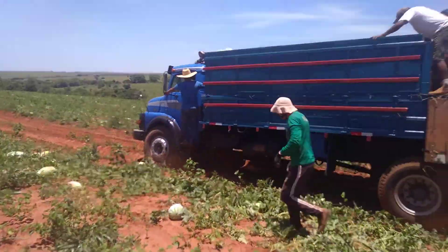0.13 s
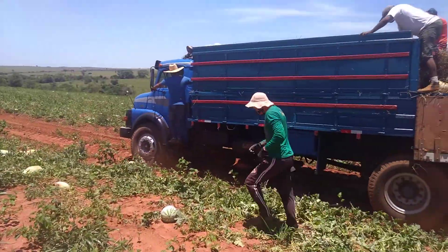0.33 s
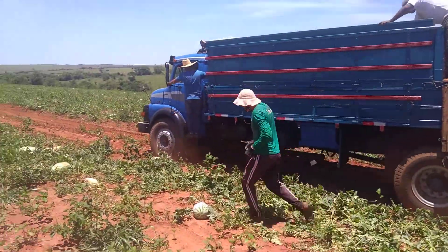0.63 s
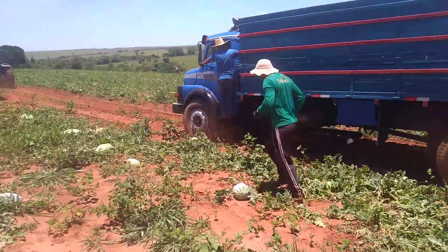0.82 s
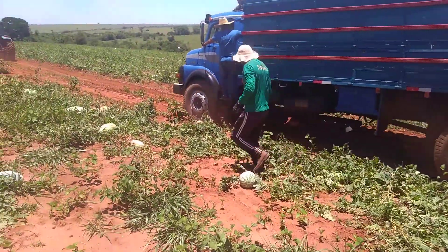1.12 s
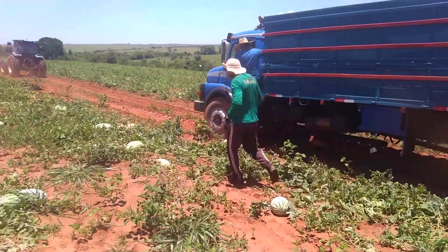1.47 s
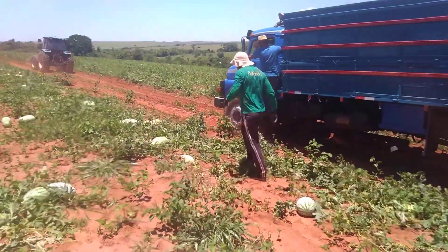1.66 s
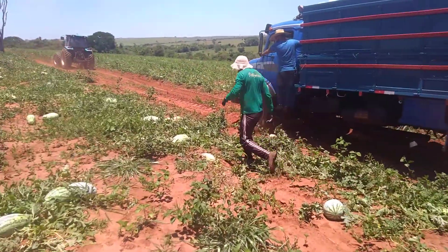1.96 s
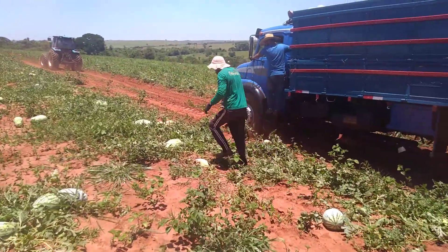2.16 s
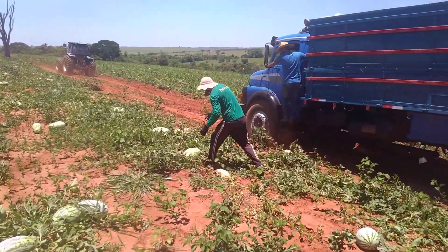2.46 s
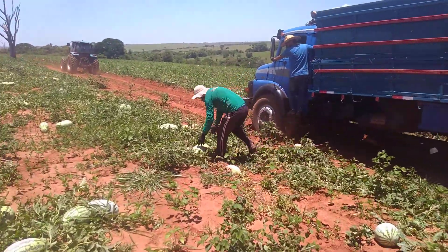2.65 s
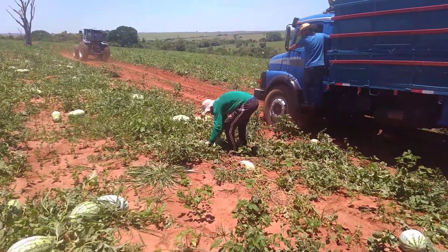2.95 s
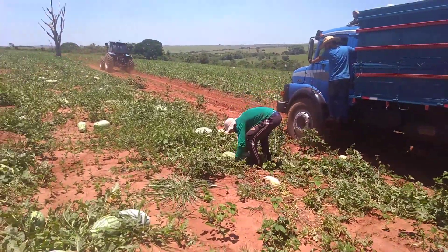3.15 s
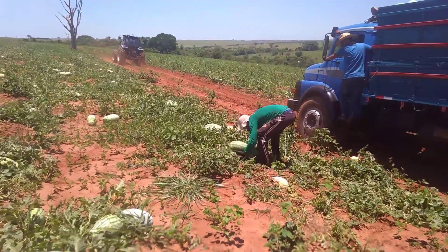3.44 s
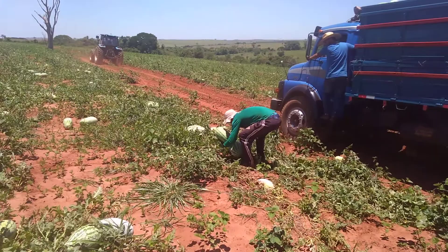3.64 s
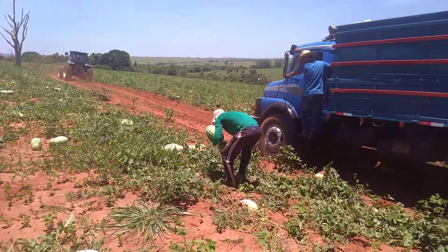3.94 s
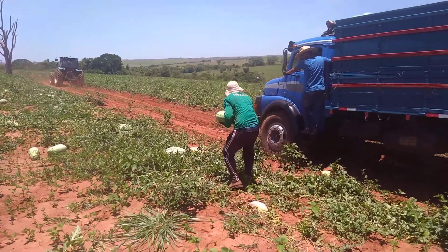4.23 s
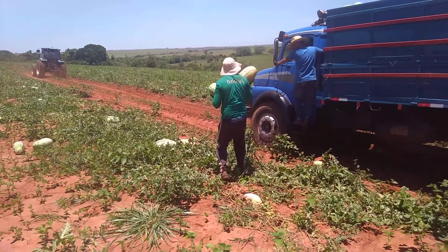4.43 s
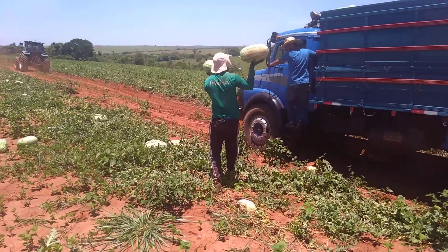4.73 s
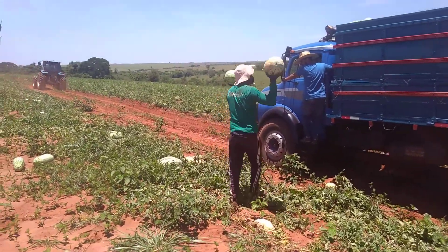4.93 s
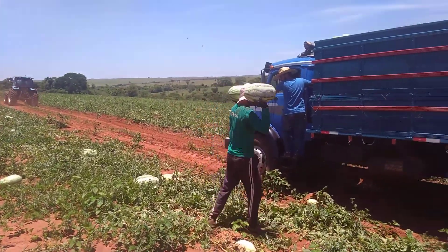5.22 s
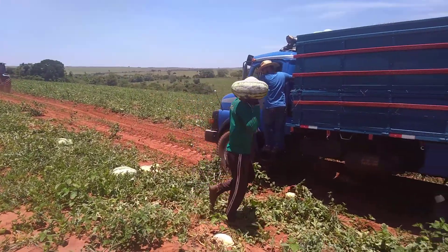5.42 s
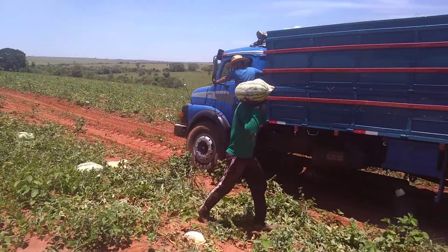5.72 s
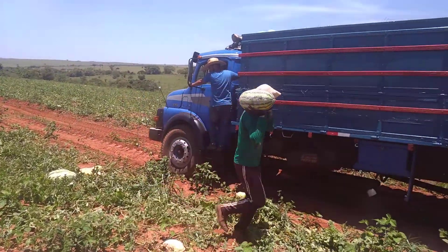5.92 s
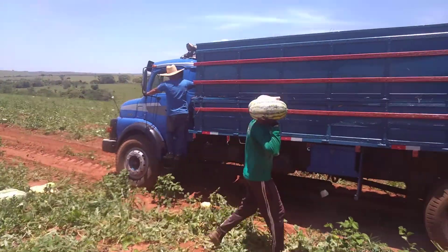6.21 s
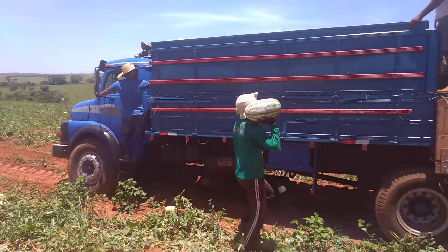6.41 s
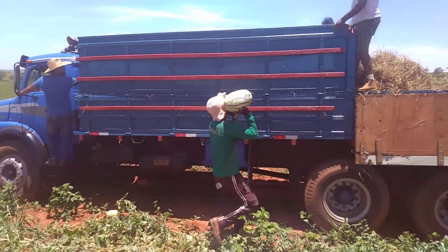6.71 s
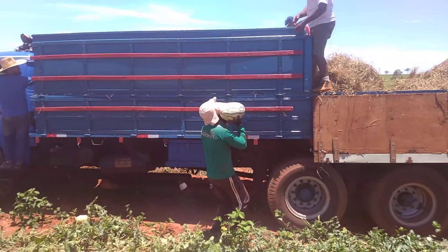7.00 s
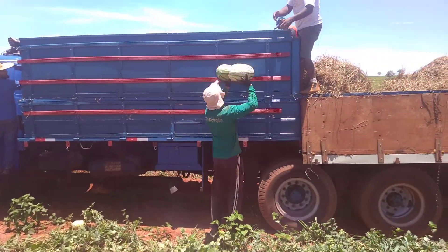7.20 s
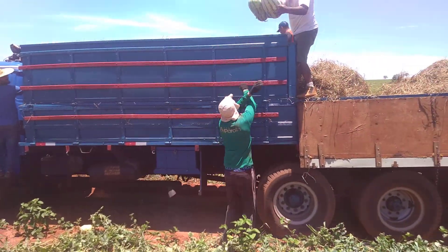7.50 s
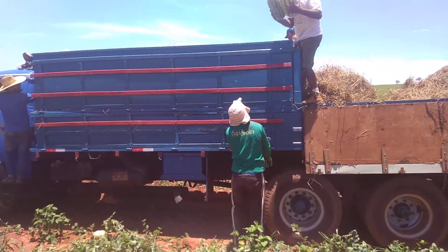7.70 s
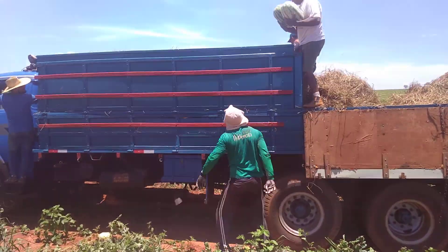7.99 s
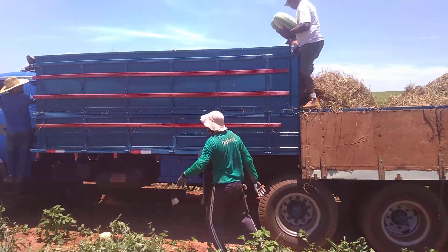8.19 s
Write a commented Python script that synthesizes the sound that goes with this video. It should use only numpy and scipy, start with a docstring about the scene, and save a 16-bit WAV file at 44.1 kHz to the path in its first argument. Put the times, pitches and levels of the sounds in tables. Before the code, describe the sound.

A big diesel truck idles unevenly in an open field, then bursts into loud booms, hard clattering and steel knocks before settling again.

```python
"""A diesel truck's exhaust booms and drones at a hunting idle while its block clatters and injections ping.
Sines and noise bursts locked to one six-cylinder crank make the engine; bursts of load harden its cracks.
Struck modes make steel knocks, clinks of a loose fitting and thumps of the cargo body.
Shaped noise makes the open-air hiss, the swish of dry leaves and the rumble as the exhaust swells."""
import sys
import numpy as np
from scipy import signal
from scipy.fft import rfft, irfft
from scipy.io import wavfile
from scipy.ndimage import uniform_filter1d, map_coordinates

SR = 44100
rng = np.random.default_rng(int(sys.argv[2]) if len(sys.argv) > 2 else 0)


def generate_wav(sig):
    """Save sig (samples, or channels by samples) to the path in sys.argv[1] as 16-bit PCM at SR."""
    pcm = np.round(np.clip(np.atleast_2d(sig).T, -1, 1) * 32767).astype(np.int16)
    wavfile.write(sys.argv[1], SR, pcm)


N = 368676
T = np.arange(N) / SR  # seconds

# The cylinders' relative strengths in firing order.
# Each row: exhaust in dB, knock in dB, tick in dB.
CYLINDERS = [(1, -1, -5), (-4, -3, -9), (-3, -3, -9), (0, -1, -6), (2, 3.5, 4), (2, 3, 2.5)]


def undb(db):
    """Decibels to gain."""
    return 10 ** (np.asarray(db) / 20)


def curves(table):
    """Each column of a table as a line through time."""
    s, *columns = np.transpose(table)
    return [np.interp(T, s, column) for column in columns]


def unit(x):
    """Scale to rms 1."""
    return x / np.sqrt(np.mean(x ** 2))


def pan(db):
    """Left and right gains, db apart, whose mean is 1."""
    gains = undb(np.array([db, -db]).reshape(2, -1) / 2)
    return gains / gains.mean(axis=0)


def colour(x, points):
    """Causal minimum-phase filter with the given (Hz, dB) outline; the result has rms 1."""
    hz, db = np.transpose(points)
    f = np.maximum(np.fft.rfftfreq(2 * N, 1 / SR), 1)
    skirts = np.minimum(f / hz[0], 1) ** 2 * np.minimum(hz[-1] / f, 1) ** 2
    outline = undb(np.interp(np.log(f), np.log(hz), db))
    # folding the cepstrum forward in time makes the filter causal
    cepstrum = irfft(np.log(skirts * outline))
    response = np.exp(rfft(2 * cepstrum[:N], 2 * N))
    return unit(irfft(rfft(x, 2 * N) * response)[..., :N])


def walk(rate):
    """Smooth random drift of rms 1, with rate new values a second."""
    k = int(SR / rate)
    steps = np.repeat(rng.standard_normal(N // k + 1), k)
    return unit(uniform_filter1d(uniform_filter1d(steps, k), k)[:N])


def air(side):
    """Stereo noise; side is the weight of the part opposite in the two ears."""
    mid, other = rng.standard_normal((2, N))
    return mid + side * other * np.array([[1], [-1]])


def firings(crank, pattern_db, scatter_db, decay, rise=0.006):
    """Each firing swells and dies within shares of its period; every cylinder has its own strength."""
    index, phase = np.floor(crank).astype(int), crank % 1
    scatter = scatter_db * rng.standard_normal(index.max() + 1)[index]
    size = undb(pattern_db[index % len(pattern_db)] + scatter)
    return unit(size * (1 - np.exp(-phase / rise)) * np.exp(-phase / decay))


def swells(column):
    """Left and right gain of one part of the exhaust's bell-shaped swells, summed as power."""
    # Surges of the exhaust and the air around it.
    # Each row: peak in seconds, time from the peak to 1/e in seconds, boom level in dB, drone level in dB,
    # pulse gain in dB, rumble level in dB, left minus right in dB.
    surges = [(0.937, 0.18, -28, -33, -53, -41, 5), (4.559, 0.056, -46, -32.5, -41, -31.5, 3),
              (4.667, 0.071, -22, -24.5, -38, -28, -4), (4.77, 0.041, -26.5, -45, -77, -51, -1),
              (5.134, 0.097, -20.5, -21, -26, -26, -14), (5.249, 0.077, -37, -15, -50, -60, 10.5),
              (5.39, 0.15, -37, -26.5, -31.5, -30.5, 6.5), (5.556, 0.16, -38.5, -15, -35, -48, 9.5),
              (5.572, 0.059, -40.5, -32, -22, -43, 2), (5.791, 0.16, -38, -31.5, -36.5, -47.5, 6),
              (6.08, 0.14, -24, -33, -38.5, -39, -18), (6.304, 0.16, -31, -37.5, -54, -37.5, -11),
              (6.617, 0.16, -28.5, -34, -45.5, -40, -8), (7.78, 0.81, -43, -49, -75, -49, 1)]
    power = 0
    for row in surges:
        bell = np.exp(-((T - row[0]) / row[1]) ** 2)
        power = power + (undb(row[column]) * bell * pan(row[-1])) ** 2
    return np.sqrt(power)


def engine_cycle(crank):
    """Position in engine cycles: one cycle takes a firing of every cylinder."""
    return (crank - 5.1) / len(CYLINDERS)


def boom(crank, hz, lope=0.13, idle_lope=0.23, flutter_db=1.83):
    """A deep tone at the firing rate, picked out at idle by the pipe's resonance."""
    # the idle tone is 1 dB down one width away from the resonance
    level_db, resonance_hz, width_hz = -37, 45.6, 1.73
    cycle = engine_cycle(crank)
    idle = 0
    # neighbours one cycle rate away make the boom throb off resonance
    for k in (-1, 0, 1):
        off_hz = hz * (1 + k / len(CYLINDERS)) - resonance_hz
        gain = idle_lope ** abs(k) * undb(level_db - (off_hz / width_hz) ** 2)
        idle = idle + gain * unit(np.sin(2 * np.pi * (crank + k * cycle)))
    loping = (1 + lope * np.cos(2 * np.pi * cycle)) * np.sin(2 * np.pi * crank)
    swelling = unit(loping) * swells(2)
    return (idle * pan(4.5) + swelling) * undb(flutter_db * walk(17))


def drone(crank, hz, lope=0.25, flutter_db=1.83):
    """A tone at twice the firing rate that lopes in level and phase once an engine cycle."""
    level_db, db_per_hz, reference_hz = -38.5, 0.41, 45.6  # the idle part grows with engine speed
    turn = 2 * np.pi * engine_cycle(crank)
    tone = (1 + lope * np.cos(turn)) * np.sin(4 * np.pi * crank + lope * np.sin(turn))
    idle_gain = undb(level_db + db_per_hz * (hz - reference_hz)) * pan(4.5)
    return unit(tone) * undb(flutter_db * walk(16)) * np.hypot(idle_gain, swells(3))


def exhaust_pulses(crank, idle_gain_db=-48.5, gas=0.44):
    """Sharp pipe pulses at idle give way to growling overtones in the swells; each firing puffs noise."""
    # Outline of the pipe. Each row: frequency in Hz, level in dB.
    pipe_outline = [(60, -4), (112, -5), (135, -1.5), (157, 5), (182, -1), (208, 2), (232, -5.5),
                    (300, -4.5), (400, -15), (560, -22.5), (900, -51)]
    # Exhaust overtones under load. Each row: frequency in Hz, level in dB.
    growl_outline = [(100, -13), (155, 5), (260, -2.5), (420, -10.5), (600, -18), (1000, -31.5)]
    surge = swells(4).mean(axis=0)
    pulse_gain = np.hypot(undb(idle_gain_db), surge)
    pattern_db = np.transpose(CYLINDERS)[0]
    loaded = np.clip((surge / pulse_gain) ** 4, 0, 1)
    idle = colour(firings(crank, pattern_db, scatter_db=2.5, decay=0.014), pipe_outline)
    # under load the cylinders fire more evenly, so the overtones stand clear
    pulling = -colour(firings(crank + .24, pattern_db / 2, scatter_db=3, decay=.04), growl_outline)
    puff_noise = air(side=0.067) * firings(crank, pattern_db, scatter_db=1.0, decay=0.72)
    puffs = colour(puff_noise, pipe_outline) * (gas + 0.59 * (1 - loaded))
    pulses = np.sqrt(1 - loaded) * idle * 0.69 + np.sqrt(loaded) * pulling + puffs
    return pulses * pulse_gain * pan(4.3)


def exhaust(crank, hz):
    """The pipe sounds two loping deep tones together with the pressure pulse of each firing."""
    return boom(crank, hz) + drone(crank, hz) + exhaust_pulses(crank)


def load(column):
    """Left and right gain of one part of the bursts of load: attack, hold, release."""
    # The engine takes load in bursts.
    # Each row: start in seconds, length before release in seconds, relative clatter level in dB,
    # relative injection crack level in dB, left minus right in dB.
    efforts = [(4.453, 0.14, -1.5, -5.5, 0.5), (4.574, 0.084, -5.5, -8, -5), (4.877, 0.16, -1, -8, -1),
               (5, 0.18, 0.5, -5, -8.5), (5.294, 0.31, -2.5, -0.5, 6), (5.725, 0.33, -6, -9, -3),
               (6.178, 0.2, -8.5, -15.5, -11.5), (6.424, 0.17, -13.5, -18, -21)]
    attack_s, release_s = 0.041, 0.043
    power = 0
    for row in efforts:
        s, length = row[:2]
        attack = np.clip((T - s) / attack_s, 0, 1)
        release = np.exp(-np.maximum(T - s - length, 0) / release_s)
        power = power + (attack * release * undb(row[column]) * pan(row[-1])) ** 2
    return np.sqrt(power)


def covers(drive, grain_db=6.5, seating_db=6.5):
    """Thin covers resonate to uneven grains of the block noise; each comes and goes on its seat."""
    # Resonances of the engine's covers. Each entry: frequency in Hz.
    cover_modes = [759, 958, 1077, 1322, 1594, 2010, 2330]
    tilt_db_per_octave, width_hz = -2, 41
    out = 0
    for hz in cover_modes:
        grains = drive * undb(grain_db * walk(260))
        ring = signal.lfilter(*signal.iirpeak(hz, hz / width_hz, fs=SR), grains)
        tilt_db = tilt_db_per_octave * np.log2(hz / cover_modes[0])
        out = out + ring * undb(tilt_db + seating_db * walk(9))
    return unit(out)


def ping(crank, sustain=0.47, crack_hz=2780, crack_ring=0.73, upper_ring_hz=3350):
    """Every injection renews a thin, fluttering ring; load adds hard, ringing cracks."""
    # Injector ping at idle.
    # Each row: time in seconds, pitch in Hz, ring level in dB, upper ring level in dB.
    ping_course = [(.45, 3200, -77, -79), (.85, 3154, -61.5, -70), (1.95, 3107, -62.5, -60.5),
                   (2.35, 3180, -79, -93), (3.05, 3050, -64, -76), (3.65, 3107, -59.5, -77),
                   (3.92, 3026, -56.5, -60), (4.05, 3060, -63, -68), (4.22, 3066, -51.5, -60),
                   (4.47, 3080, -55, -87), (4.6, 3100, -73.5, -79)]
    # Ring of the hard injections under load. Each row: frequency in Hz, level in dB.
    rasp_outline = [(1100, -19.5), (1300, -7.5), (1700, -8.5), (2100, -33), (2450, -17), (2700, 7),
                    (2950, -0.5), (3200, -13), (3700, -24), (4500, -6.5), (4850, -9), (5300, -10.5),
                    (6200, -18.5), (9000, -20), (11000, -53)]
    hz, db, upper_db = curves(ping_course)
    stroke = crank + .1
    pattern_db = np.transpose(CYLINDERS)[1]

    def ring(hz, breadth):
        """A tone roughened by phase wander (radians) and level flutter."""
        wander = breadth * walk(480) + 1.5 * walk(60)
        return unit(np.sin(2 * np.pi * np.cumsum(hz) / SR + wander) * undb(2 * walk(160)))

    strokes = unit(sustain + firings(stroke, pattern_db / 2, scatter_db=2.2, decay=.17, rise=.2))
    lower_ring = ring(hz, 0.8) * undb(db)
    upper_ring = ring(np.full(N, upper_ring_hz), 2.1) * undb(upper_db)
    idle = strokes * (lower_ring + upper_ring)
    injections = unit(.3 + firings(stroke, pattern_db / 3, scatter_db=2, decay=.11, rise=.3))
    rasp = colour(air(side=.6) * injections, rasp_outline)
    cracks = rasp + crack_ring * injections * ring(np.full(N, crack_hz), 1.6)
    return idle + cracks * undb(-40) * load(3) * pan(-1.0)


def clatter(crank, knock_flutter_db=1.0, knock_wash=1.0, even_load=0.23):
    """Combustion rattles the block and knocks in the cylinders; pump and valves tick in a cyclic pattern."""
    # Outlines of the block, the knock and the ticks. Each row: frequency in Hz, level in dB.
    block_outline = [(300, -19), (560, -14.5), (760, 6), (1050, 3), (1300, 6.5), (1600, -3), (2100, -2.5),
                     (2700, -19), (4000, -24), (9000, -46)]
    knock_outline = [(700, -29), (1300, 17.5), (1750, 8), (2020, -3), (2450, 5), (2900, 0.5), (3700, -7),
                     (4400, -3), (4850, -19.5), (5200, -2.5), (7000, -19), (9200, -29), (10200, -36),
                     (15000, -87)]
    tick_outline = [(1300, 1), (2350, 8), (2900, 5), (3500, 3.5), (4200, 1.5), (4900, -4.5), (5120, 0),
                    (5600, 0), (6300, -7), (7400, -7), (10000, -19), (15500, -43)]
    # Clatter between the bursts.
    # Each row: time in seconds, block gain in dB, tick gain in dB.
    idle_course = [(0, -49.5, -69.5), (.55, -49.5, -57.5), (1.1, -53.5, -63), (2.5, -52, -63.5),
                   (3.3, -55.5, -62.5), (4.45, -52, -62.5), (4.78, -57.5, -83), (5.2, -42, -48.5),
                   (6.5, -49, -60), (6.93, -43, -54.5), (7.5, -49.5, -61.5), (8.36, -51, -60)]
    # Bearing of the engine. Each row: time in seconds, lead of the left ear in ms.
    bearing = [(0, 0.11), (1.2, 0.23), (3.7, 0.25), (5.7, 0.353), (6.7, 0.02)]
    knock_over_tick_db, load_db, cover_db = -9.5, -42, -7
    _, knock_pattern, tick_pattern = np.transpose(CYLINDERS)
    block_db, tick_db = curves(idle_course)
    effort = load(2)

    def gain(idle_db):
        """Idle and load add as power."""
        return np.hypot(undb(idle_db) * pan(3), undb(load_db) * effort)

    stroke = crank + .08
    # the harder the engine works, the more alike its cylinders tick
    contrast = np.interp(effort.mean(axis=0), [0, even_load], [1, .45])
    block_beat = firings(stroke, knock_pattern, scatter_db=2.6, decay=.6, rise=.1)
    knock_beat = firings(stroke, knock_pattern * .6, scatter_db=2.6, decay=.2, rise=.1)
    tick_beat = firings(stroke, tick_pattern, scatter_db=1.6, decay=.8, rise=.1)
    block_noise = air(side=.4) * (1 + block_beat)
    knock_noise = air(side=.6) * (knock_wash + knock_beat) * undb(knock_flutter_db * walk(170))
    tick_noise = air(side=.9) * (.17 + tick_beat) ** contrast
    block = 0.68 * colour(block_noise, block_outline) + undb(cover_db) * covers(block_noise)
    block = block * gain(block_db)
    knock = colour(knock_noise, knock_outline) * gain(tick_db + knock_over_tick_db)
    ticks = colour(tick_noise, tick_outline) * gain(tick_db) * pan(4)
    left, right = block + knock + ticks + ping(crank)
    # delay the right ear
    lead_ms, = curves(bearing)
    return np.array([left, map_coordinates(right, [np.arange(N) - lead_ms * SR / 1000], order=3)])


def open_air():
    """Soft, slowly drifting hiss of the open field, as shaped noise."""
    # Outline of the hiss. Each row: frequency in Hz, level in dB.
    hiss_outline = [(200, -3.5), (600, -19.5), (800, -10), (1300, -16.5), (2500, -25), (4000, -31.5),
                    (7000, -38.5), (11000, -41), (15500, -43)]
    return colour(air(side=0.42), hiss_outline) * undb(-55.5 + 0.35 * walk(0.9)) * pan(5.9)


def rumble():
    """The air rumbles with each exhaust swell, as low noise."""
    outline = [(10, -35), (28, -25.0), (50, 3), (100, -2.0), (250, -18), (600, -27.0)]
    return colour(air(side=0.75), outline) * swells(5)


def dry_leaves():
    """Leaves brush in short bell-shaped swishes of crisp, grainy noise."""
    # Swishes of leaves.
    # Each row: peak in seconds, level in dB, bell's standard deviation in seconds, left minus right in dB.
    swish_list = [(0.61, -58.5, 0.034, 8), (0.912, -60, 0.032, 22), (0.99, -61, 0.04, 24),
                  (1.508, -49, 0.015, 8), (2.07, -56, 0.03, 22), (2.443, -55.5, 0.036, 24),
                  (4.531, -49, 0.028, 14), (4.928, -49, 0.026, 17), (6.136, -47.5, 0.012, 4.5),
                  (6.19, -50.5, 0.038, -1), (6.925, -53, 0.032, 26)]
    # Outline of the leaves. Each row: frequency in Hz, level in dB.
    leaf_outline = [(2000, 14.5), (5000, 4.1), (8500, 11), (10500, 4.3), (11700, 2), (12400, 17),
                    (15500, 9)]
    brushing = 0
    for s, db, length, side_db in swish_list:
        bell = np.exp(-((T - s) / length) ** 2 / 2)
        brushing = brushing + undb(db) * bell * pan(side_db)
    grain = undb(2.3 * walk(500) + 2 * walk(70))
    return colour(air(side=0.62) * grain, leaf_outline) * brushing


def mix_in(out, s, sound):
    """Mix a sound in at a time."""
    start = max(int(s * SR), 0)
    out[:, start:start + sound.shape[-1]] += sound[..., :N - start]


def strike(modes, extra_db, detune, spread):
    """One ring of a table of modes, a little different every time; spread (radians) sets the ears apart."""
    hz, db, t60 = np.transpose(modes)[:, :, None]
    t = T[:SR // 4]
    off, left, right = rng.standard_normal((3, len(modes), 1))
    rings = undb(db + extra_db - 60 * t / t60)
    turn = 2 * np.pi * hz * (1 + detune * off) * t + np.pi * rng.integers(0, 2, hz.shape)
    ears = [(rings * np.sin(turn + spread * ear)).sum(axis=0) for ear in (left, right)]
    return np.array(ears) / np.sqrt(np.sum(rings[:, 0] ** 2))


def contact(contact_s):
    """Onset of a blow: the softer the contact, the longer it takes."""
    return 1 - np.exp(-(T[:SR // 4] / contact_s) ** 2)


def noise_burst(noise, s, decay):
    """A decaying quarter second of noise taken from time s."""
    t = T[:SR // 4]
    return np.roll(noise, -int(s * SR), axis=1)[:, :len(t)] * np.exp(-t / decay)


def metal_grit():
    """Noise of metal parts rattling on each other."""
    outline = [(700, 2.5), (1400, 14), (2450, 13), (3100, -14.5), (5500, 3), (9000, -20), (14000, -62)]
    return colour(air(side=0.77), outline)


def steel_knocks(rattle_decay=0.029, rattle_share=0.2):
    """Hard knocks ring the modes of the engine's steel and rattle it."""
    # Modes of the steel. Each row: frequency in Hz, level in dB, t60 in seconds.
    steel_modes = [(960, -8, .04), (1275, 1, .09), (1370, -3, .05), (1560, -6, .04), (2110, -13, .04),
                   (2380, -5, .04), (2560, -3, .016), (2710, 0, .016), (2870, 0, .017), (3020, -6, .018),
                   (4540, -18, .02), (5200, -14, .025)]
    # The hardest knocks of the engine.
    # Each row: start in seconds, strength in dB before the trim, boost of the modes above 2 kHz in dB.
    knock_list = [(0.6722, -38, 6), (1.3533, -37, -1), (1.736, -37, -17), (1.7927, -36, -17),
                  (1.93, -33.5, -8), (2.1943, -35, -1), (2.468, -36, -2), (2.594, -36, 2), (2.962, -37, -8),
                  (3.9494, -37, 7), (4.1943, -37, 4), (4.584, -22, 16), (4.628, -24.5, 8),
                  (4.9485, -15, 14), (5.0392, -24, 3), (5.205, -18, 16), (5.3243, -20, 2), (5.346, -14, 16),
                  (5.367, -23, 16), (5.408, -15, 18), (5.428, -13, 16), (5.4466, -18, 12), (5.467, -23, -6),
                  (5.525, -17, 14), (5.544, -20, 12), (5.561, -19, 6), (5.621, -26, -10), (5.7578, -31, -3),
                  (5.799, -14.5, 15), (5.8234, -27, -6), (6.015, -28, -13), (6.319, -25.5, 0),
                  (6.787, -32, -6), (6.876, -28, -6), (6.972, -24, -9), (7.0546, -25, 4), (7.075, -28, 4),
                  (7.1756, -28.5, -3), (7.3176, -31, -5), (7.4438, -30, 5), (7.465, -32, -10)]
    out, firm, grit = np.zeros((2, N)), contact(.0009), metal_grit()
    bright = np.array(steel_modes)[:, :1] > 2000
    for s, db, bright_db in knock_list:
        ring = strike(steel_modes, bright_db * bright, detune=.015, spread=.7)
        # the duller the knock, the more it rattles
        dullness = 1 / np.hypot(1, (undb(bright_db) / 2) ** 2)
        rattle = rattle_share * noise_burst(grit, s, rattle_decay) * dullness
        mix_in(out, s, firm * (ring + rattle) * undb(db - 3.5))
    return out


def fitting_clinks(rattle_decay=0.029, rattle_share=0.2):
    """A loose fitting clinks: each firm tap rings its high modes with a little rattle."""
    # Modes of the fitting. Each row: frequency in Hz, level in dB, t60 in seconds.
    fitting_modes = [(3610, -1, 0.064), (4530, 0, 0.046), (5150, 2, 0.085), (5380, -1, 0.049),
                     (5760, -3, 0.06), (5600, -9, 0.077), (7500, -9, 0.066)]
    # Clinks. Each row: start in seconds, strength in dB before the trim.
    clink_list = [(0.805, -42), (1.362, -43), (1.53, -42), (3.497, -39), (6.705, -39), (6.811, -32.5),
                  (6.831, -30), (6.953, -42), (7.0543, -35), (7.075, -37), (7.178, -47), (7.3027, -39),
                  (7.445, -34), (7.5524, -32), (7.572, -37), (7.6794, -43), (8.073, -38), (8.344, -39)]
    out, firm, grit = np.zeros((2, N)), contact(.0009), metal_grit()
    for s, db in clink_list:
        ring = strike(fitting_modes, 0, detune=.015, spread=1.1)
        rattle = rattle_share * noise_burst(grit, s, rattle_decay)
        mix_in(out, s, firm * (ring + rattle) * undb(db - 8.0) * pan(7.1))
    return out


def body_thumps(thump_decay=0.044, board_noise=0.15):
    """Soft blows ring the low modes of the cargo body, with a dull noise of its boards."""
    # Modes of the cargo body. Each row: frequency in Hz, level in dB, t60 in seconds.
    body_modes = [(163.6, -4, 0.28), (191, -7.5, 0.33), (214.6, -7, 0.33), (245.3, -0.5, 0.11),
                  (291.5, -6, 0.11), (347, -15.5, 0.058)]
    # Thumps. Each row: start in seconds, strength in dB before the trim, tilt of the ring in dB per octave.
    thump_list = [(1.065, -28.5, 4), (1.228, -35.5, 1), (1.52, -29.5, 11), (1.921, -37, 17),
                  (2.191, -33.5, -13), (2.478, -37, -25), (2.961, -34.5, -15), (4.941, -21.5, 18.5),
                  (5.423, -14.5, 18), (5.542, -18.5, 7)]
    outline = [(110, -22), (170, -7.5), (280, 7), (430, -12), (700, -7), (2000, -8.5), (9000, -43)]
    out, soft, boards = np.zeros((2, N)), contact(.005), colour(air(side=0.083), outline)
    octaves = np.log2(np.array(body_modes)[:, :1] / body_modes[0][0])
    for s, db, tilt_db in thump_list:
        ring = strike(body_modes, tilt_db * octaves, detune=0.0089, spread=0.15)
        thud = board_noise * noise_burst(boards, s, thump_decay)
        mix_in(out, s, soft * (ring + thud) * undb(db - 1) * pan(2.9))
    return out


def scene():
    """One crankshaft drives the exhaust and the clatter; the field and the blows lie around them."""
    # Engine speed. Each row: time in seconds, firing rate in Hz.
    speed_course = [(0.0, 51.05), (0.45, 50.48), (0.84, 45.22), (1.45, 40.4), (2.54, 48.53), (3.64, 42.12),
                    (4.46, 39.86), (4.7, 48.32), (4.9, 40.01), (5.2, 50.29), (5.38, 48.65), (5.6, 52.9),
                    (5.92, 47.0), (6.33, 44.28), (6.72, 48.58), (7.05, 49.7), (7.68, 46.36), (8.36, 44.09)]
    hz, = curves(speed_course)
    crank = np.cumsum(hz) / SR + .15  # counted in firings
    engine = exhaust(crank, hz) + clatter(crank)
    surroundings = open_air() + rumble() + dry_leaves()
    return engine + surroundings + steel_knocks() + fitting_clinks() + body_thumps()


def record(dry):
    """The deepest bass is cut away and nothing sounds above about 16 kHz."""
    bass_cut = signal.butter(3, 29, "high", fs=SR, output="sos")
    treble_cut = signal.ellip(8, .2, 70, 15800, fs=SR, output="sos")
    return signal.sosfilt(np.vstack([bass_cut, treble_cut]), dry)


dry = scene()
out = record(dry)
generate_wav(out)
```